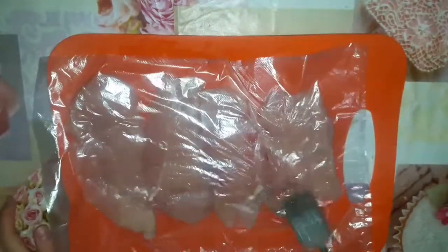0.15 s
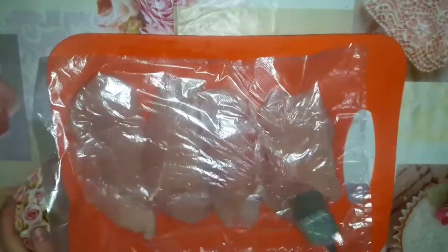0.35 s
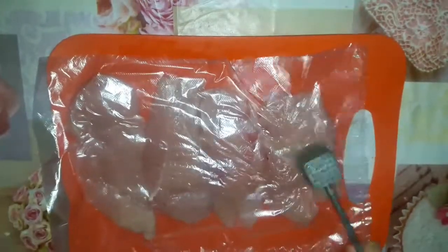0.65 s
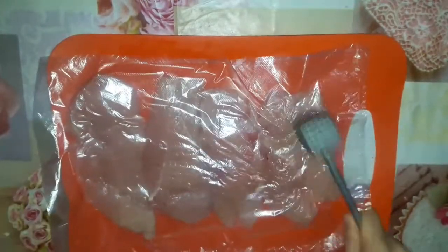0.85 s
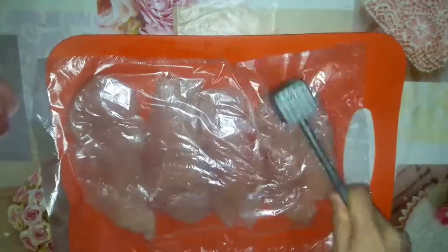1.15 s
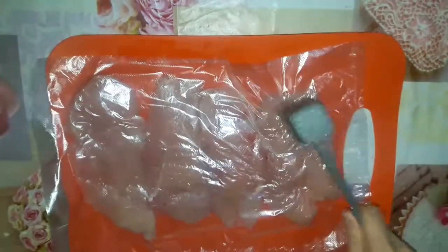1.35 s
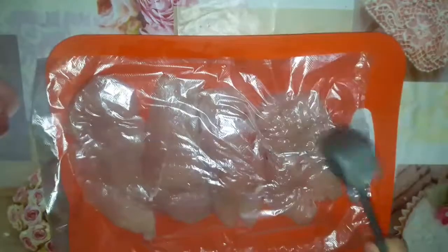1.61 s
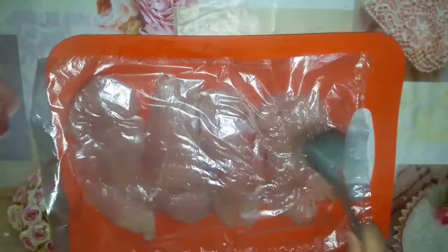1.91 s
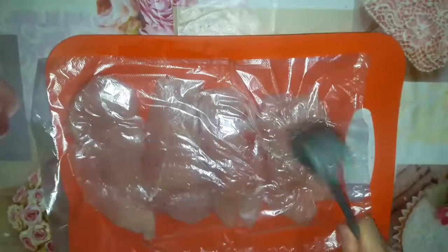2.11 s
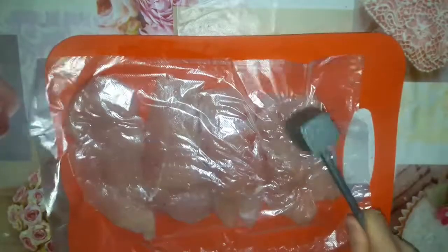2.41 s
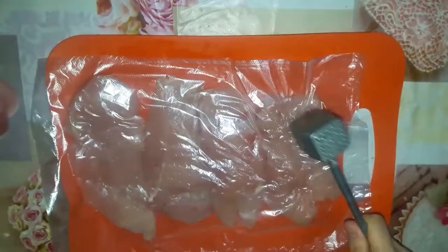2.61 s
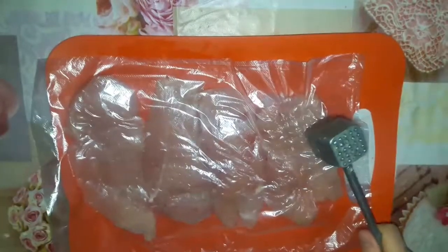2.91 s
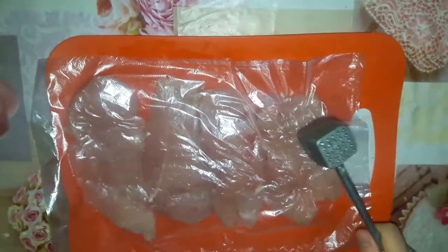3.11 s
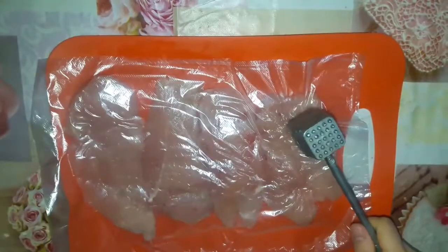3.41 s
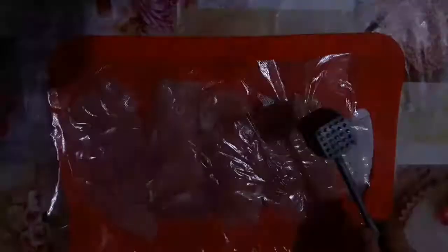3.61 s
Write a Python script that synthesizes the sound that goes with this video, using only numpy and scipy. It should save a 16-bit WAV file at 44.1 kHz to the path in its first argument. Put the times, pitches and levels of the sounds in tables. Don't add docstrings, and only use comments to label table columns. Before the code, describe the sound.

A meat mallet strikes meat through a plastic bag on a plastic board, close up. Twelve even blows run from 0.1 to 2.5 seconds, about five per second, each a crisp film crunch, hard hollow clack and short low thud, generally louder later. Faint sticky ticks follow some blows. Afterwards, soft kitchen hum and hiss remain, with barely audible bag rustles near 3.3 and 3.5 seconds.

```python
import sys
import numpy as np
from scipy import signal
from scipy.fft import rfft, irfft, next_fast_len
from scipy.io import wavfile
from scipy.ndimage import uniform_filter1d

SR = 44100
rng = np.random.default_rng(int(sys.argv[2]) if len(sys.argv) > 2 else 0)


def convert_level_to_amplitude(level_db):
    exponent = np.asarray(level_db, float) / 20
    return 10 ** exponent


def pcm_store(signal):
    levels = np.round(np.clip(np.atleast_2d(signal), -1, 1) * 32767)
    wavfile.write(sys.argv[1], SR, levels.astype(np.int16).T)


N = 165375
PAD = SR // 5

# frequency in Hz, level in dB per Hz.
FLOOR = [(15, -65), (60, -17), (118, -22), (170, -11), (385, -9.5), (414, -14), (599, -13), (1530, -15.5),
         (9000, -38), (11700, -61), (19800, -120)]
FLOOR_DB, HUMS_DB = -61, -67
# frequency in Hz, width in Hz, level in dB.
HUMS = [(142.8, 31, -1), (429, 17, -7.5), (1250, 21, -9), (1541, 38, -12.5), (2780, 110, -15.5),
        (4240, 200, -26.5)]
# frequency in Hz, level in dB.
WHINES = [(199, -73), (240, -75), (1280, -78), (1500, -74), (1600, -83), (145, -68)]
# frequency in Hz, level in dB per Hz.
HISS = [(4710, -38.5), (8000, -25), (10500, -3.5), (11300, -3), (14500, 2), (16000, -2.5)]
HISS_DB = -74.5
# frequency in Hz, likeness from -1 to 1.
PORT_LIKENESS = [(60, 1), (240, 0.93), (950, -0.13), (3770, -0.14), (15000, -0.026)]
# frequency in Hz, left minus right in dB.
PORT_LEAN = [(100, 2), (300, 2.5), (600, 2.5), (2000, 3.5), (5000, 4), (8000, -1), (14000, -1.5)]
APART = 0.4

# start in seconds, clack in dB, clack pitch in Hz, thud in dB, board ring in dB.
BLOWS = [(0.1251, -9, 1613, -14, -24.5), (0.3186, -9.5, 1860, -13.5, -26.5), (0.5007, -5.5, 1880, -17, -12),
         (0.7269, -16.5, 1650, -19, -28.5), (0.9357, -12.5, 1830, -15.5, -22),
         (1.1434, -5.5, 1890, -17.5, -26), (1.359, -4, 1825, -16.5, -27), (1.5878, -12, 1742, -17.5, -26),
         (1.8229, -5.5, 1690, -18, -28), (2.0265, -3, 1938, -14.5, -23), (2.2446, -4, 1930, -19, -27),
         (2.4587, -3, 1940, -18, -27)]
# clack in dB, clack pitch in Hz, thud in dB, board ring in dB.
EARLIER_BLOW = (-17.5, 1803, -22, -22.5)
EARLIER_S = -0.096

# start in seconds, crush in dB, settling in dB,
# settling brightness in dB per octave, creeping in dB.
CRUSHES = [(0.1243, -18.5, -35, 2.6, -45), (0.319, -18, -33, 1.9, -46.5), (0.4973, -27, -31.5, 0.6, -43.5),
           (0.7234, -23.5, -35, 3.6, -50.5), (0.9354, -19.5, -33.5, 3.9, -46),
           (1.1378, -16.5, -29.5, 1.7, -45), (1.3558, -19.5, -30, -0.4, -48), (1.5852, -20, -33, 0, -49),
           (1.8209, -23.5, -33, 0.2, -56), (2.0237, -22.5, -28.5, -0.1, -49),
           (2.2402, -23.5, -34.5, 2.1, -51), (2.454, -19.5, -27, -1.4, -45.5)]
EARLIER_CRUSH = (-24, -28, 4, -44.5)
# frequency in Hz, level in dB per Hz.
BAG = [(1060, -25), (1800, -1), (5540, -2), (7840, -7), (9420, -14), (10700, -6), (11700, -5), (16000, -15)]
BAG_DB, BAG_SNAPS_PER_S, BAG_SPREAD_DB = -7, 25000, 1.5
BAG_RISE_S, BAG_HOLD_S, BAG_T60_S = 0.00053, 0.0048, 0.03
# frequency in Hz, level in dB per Hz.
SETTLE = [(240, -21), (400, -8.5), (1140, -8.5), (1440, -3.5), (1630, -4.5), (1820, -3), (3470, -12.5),
          (14400, -20.5), (16000, -24)]
# frequency in Hz, 60 dB decay in seconds.
SETTLE_T60 = [(500, .3), (2000, 0.26), (5000, 0.2), (9000, 0.14), (15000, 0.17)]
SETTLE_RISE_S, SETTLE_BEND, PATCH_DB = 0.0021, 1.104, 1.5
# frequency in Hz, level in dB per Hz.
CREEP = [(1200, -14), (3000, 3), (6000, 0.5), (9000, -9.5), (12000, -7), (16000, -15)]
CREEP_PER_S, CREEP_T60_S = 14000, 0.46

# multiple of the clack pitch, level in dB, 60 dB decay in seconds.
FACE = [(.5, -16.5, 0.013), (0.718, -16.5, 0.03), (0.931, -4, 0.016), (1.04, 10, 0.016), (1.22, 1, 0.012),
        (1.45, -2, 0.017), (1.8, -13.5, 0.012), (2.6, -24.5, 0.0069)]
# delay in ms, level against the first
# landing in dB, pitch in Hz, hardness of both landings in dB per octave.
ROCKS = [(2.46, 4, 1270, -6), (7.4, -1, 1270, 5), (2.6, -3, 1216, -32), (2.52, -1, 820, -12),
         (0.28, 7.5, 930, -6), (3.6, 7.5, 1760, -28), (2.42, -6, 1185, 11), (1.466, -11.5, 1210, -16.5),
         (1.15, 2, 1210, -16), (2.23, -13, 1120, 5), (2.27, -6, 1246, 18.5), (2.59, -14.5, 630, 13.5),
         (9.4, -6.5, 1800, -4)]
STUD_TOUCH_S, CLACK_LAG_S = 0.000068, 0.00067
# frequency in Hz, level in dB per Hz.
SLAP = [(150, -37), (250, -6.5), (430, -12), (560, -11.5), (749, -13.5), (1040, -9.5), (1590, -10),
        (1900, -18), (2600, -35.5), (3380, -57.5), (5720, -120)]
# frequency in Hz, 60 dB decay in seconds.
SLAP_T60 = [(300, 0.23), (700, 0.41), (1400, 0.13), (2500, 0.33)]
# frequency in Hz, level in dB, 60 dB decay in seconds.
PLATE = [(406, -5.5, 0.23), (481.3, 1.5, 0.14), (578, -13, 0.29), (681, -3.5, 0.1), (763, -9, 0.23),
         (863, -11.5, 0.21), (923, -19, 0.09), (1080, -18.5, 0.13), (1310, -16.5, 0.35)]
BOARD_DB, PLATE_DB, BOARD_RISE_S = -6.5, 0.5, 0.0027

# frequency in Hz, level in dB, 60 dB decay in seconds, side of the node line.
TABLE = [(62.6, -22.5, 0.21, -1), (91.8, -21.5, 0.28, -1), (113.4, 1.5, 0.035, 1), (120.8, -33, 0.71, 1),
         (145.8, -4, 0.16, -1), (151.2, -35.5, 1, 1), (176, -9, 0.069, -1), (194.7, -15.5, 0.2, 1),
         (230.4, -28, 0.37, 1), (316, -10, 0.085, -1)]
# thud lead in ms, ring length factor,
# beating partner in dB, knock in dB.
SEATS = [(-0.0047, 1.04, -16, -29), (0.87, 0.65, -13, -31.5), (0.37, 0.63, -8, -32), (2.2, 0.91, -10, -44),
         (0.43, 0.74, -11, -39), (-0.63, 0.94, -16, -28.5), (0.75, 0.8, -13, -29.5),
         (0.17, 0.88, -26, -32.5), (-0.97, 0.94, -16, -31.5), (0.77, 0.84, -19, -34.5),
         (0.36, 0.86, -13, -28.5), (1.2, 0.9, -20, -37.5), (0.7, 1.2, -13.5, -30.5)]
PUSH_LEAD_S, PUSH_S, RADIATES_HZ, THUD_DB = 0.0004, 0.004706, 122.8, 18
PARTNER_HZ, PARTNER_T60_S = 136.1, 0.14
KNOCK_HZ, KNOCK_SWELL_S = 309.7, 0.0062

# start in seconds, level in dB, tilt in dB per octave.
PEELS = [
    (0.5426, -28.5, -2),
    (.5955, -42.5, -6),
    (.262, -62, -3),
    (1.07, -60, 1),
    (1.498, -44.5, -11),
    (1.722, -44.5, -9),
    (1.947, -63, -1),
    (2.1274, -49, 4),
    (2.377, -46, -9),
    (2.599, -49.5, -9),
]
# middle in seconds, level in dB, length in seconds.
RUSTLES = [
    (3.262, -69, 0.081),
    (3.469, -73, 0.057),
]

# frequency in Hz, 60 dB decay in seconds.
KITCHEN = [(150, 0.38), (400, 0.37), (1000, 0.34), (2000, 0.43), (5000, 0.21), (12000, 0.13)]
THUD_WET_DB, CLACK_WET_DB, BAG_WET_DB, WALL_GAP_S = -22.5, -20, -18, 0.005


def evened(x):
    return x / np.sqrt(np.mean(x ** 2) + 1e-20)


def read(points, hz):
    f, value = np.transpose(points)
    return np.interp(np.log(hz + 1), np.log(f + 1), value)


def add(mix, s, sound):
    part = mix[..., PAD + round(s * SR):][..., :sound.shape[-1]]
    part += sound[..., :part.shape[-1]]


def colour(x, db):
    size = x.shape[-1]
    return irfft(rfft(x) * convert_level_to_amplitude(db(np.fft.rfftfreq(size, 1 / SR))), size)


def fading(x, shape, t60, bend):
    coloured = evened(colour(x, lambda f: read(shape, f)))
    hz, t, z = signal.stft(coloured, SR, nperseg=256)
    fall = convert_level_to_amplitude(-60 * (t / read(t60, hz)[:, None]) ** bend)
    return signal.istft(z * fall, SR, nperseg=256)[1][:, :x.shape[1]]


def ring(t, hz, db, t60):
    return convert_level_to_amplitude(db - 60 * t / t60) * np.sin(2 * np.pi * hz * t)


def snaps(size, per_s, spread_db):
    strength = convert_level_to_amplitude(spread_db * np.minimum(rng.exponential(1, size), 4))
    happens = rng.random(size) < per_s / SR
    a = rng.standard_normal((3, size)) * strength * happens
    return evened(a[0] + 3.2 * APART * a[1:])


def hush(size):
    frames, hz = size // 256 + 5, np.fft.rfftfreq(1024, 1 / SR)
    a, b, c, d, patches = rng.standard_normal((frames, 513, 5)).T
    patches = evened(uniform_filter1d(uniform_filter1d(patches, 14, 0), 10, 1))
    same = np.clip(read(PORT_LIKENESS, hz), -1, 1)[:, None]
    left = a + 1j * b
    right = same * left + np.sqrt(1 - same ** 2) * (c + 1j * d)
    z = np.array([left, right]) * convert_level_to_amplitude(1.3 * patches)

    def shaped(gain):
        return evened(signal.istft(z * gain[:, None], nperseg=1024, noverlap=768)[1][:, :size])

    hums = sum(convert_level_to_amplitude(db) / (1 + (2 * (hz - f) / width) ** 2) for f, width, db in HUMS)
    return convert_level_to_amplitude(FLOOR_DB) * shaped(convert_level_to_amplitude(read(FLOOR, hz))) + convert_level_to_amplitude(HUMS_DB) * shaped(hums)


def wander(t):
    return evened(sum(np.sin(2 * np.pi * (f * t + rng.random())) for f in np.geomspace(0.7, 9, 8)))


def whine(size):
    t, out = np.arange(size) / SR, np.zeros((2, size))
    for hz, db in WHINES:
        drift, swell = wander(t), wander(t)
        turns = hz * t + rng.random((2, 1)) / 4
        out += convert_level_to_amplitude(db + 3.6 * swell) * np.sin(2 * np.pi * turns + 1.8 * drift)
    return out


def microphone_hiss(size):
    noise = rng.standard_normal((2, size))
    return convert_level_to_amplitude(HISS_DB) * evened(colour(noise, lambda hz: read(HISS, hz)))


def crush(db, settle_db, tilt_db, creep_db):
    size = 16384
    t = np.arange(size) / SR - 4 * BAG_RISE_S
    rise = np.exp(np.minimum(t / BAG_RISE_S, 0))
    shape = rise * convert_level_to_amplitude(-60 * np.maximum(t - BAG_HOLD_S, 0) / BAG_T60_S)
    film = evened(colour(snaps(size, BAG_SNAPS_PER_S, BAG_SPREAD_DB), lambda hz: read(BAG, hz)))
    grains, noise = snaps(size, BAG_SNAPS_PER_S, 2.0), rng.standard_normal((2, size))
    wash = fading(8.1 * grains + noise, SETTLE, SETTLE_T60, SETTLE_BEND)
    wash = colour(wash, lambda hz: tilt_db * np.log2(hz / 2000 + 0.1))
    creep = snaps(size, CREEP_PER_S, 1.1) + 4.2 * noise[:, ::-1]
    creep = evened(colour(creep, lambda hz: read(CREEP, hz)))
    tail = convert_level_to_amplitude(settle_db) * wash + convert_level_to_amplitude(creep_db - 60 * t / CREEP_T60_S) * creep
    stir = evened(uniform_filter1d(uniform_filter1d(rng.standard_normal(size), 400), 400))
    fade = np.clip(np.minimum(t / SETTLE_RISE_S, 20 * (t[-1000] - t)), 0, 1)
    return convert_level_to_amplitude(db + BAG_DB) * film * shape + tail * convert_level_to_amplitude(PATCH_DB * stir) * fade


def landing(t, pitch_hz, hardness_db):
    hit = []
    for multiple, db, t60 in FACE:
        hz = pitch_hz * multiple * rng.normal(1, 0.007)
        hard_db = hardness_db * max(np.log2(multiple), 0)
        hit.append(ring(t, hz, db + hard_db + rng.normal(0, 0.73), t60))
    ports = -(1 + rng.uniform(-0.9, 0.9, (2, len(FACE)))) @ np.array(hit)
    return ports / abs(ports.mean(0)).max()


def loose_board(t):
    grains, noise = snaps(len(t), 6000, 2.6), rng.standard_normal((2, len(t)))
    rise = 1 - np.exp(-t / BOARD_RISE_S)
    slap = fading(grains + 0.53 * noise, SLAP, SLAP_T60, 0.59) * rise
    plate = convert_level_to_amplitude(PLATE_DB) * sum(ring(t, *mode) for mode in PLATE) * rise
    return slap / np.std(slap[:, :1500]) + plate


def clack(db, hz, board_db, rock):
    t, out = np.arange(16384) / SR, np.zeros((2, 16384))
    rock_ms, rock_db, rock_hz, hardness_db = rock
    for ms, rel_db, pitch_hz in [(0, 0, hz), (rock_ms, rock_db, rock_hz)]:
        at = round((CLACK_LAG_S + ms / 1000) * SR)
        out[:, at:at + 2000] += convert_level_to_amplitude(rel_db) * landing(t[:2000], pitch_hz, hardness_db)
    touch = np.hanning(round(2 * STUD_TOUCH_S * SR) + 3)
    out = convert_level_to_amplitude(db) * signal.oaconvolve(out, touch[None] / touch.sum(), axes=1)[:, :len(t)]
    high = signal.butter(2, 2 * RADIATES_HZ, "high", fs=SR, output="sos")
    return signal.sosfilt(high, out + convert_level_to_amplitude(board_db + BOARD_DB) * loose_board(t))


def thud(db, length, partner_db, knock_db):
    t = np.arange(SR // 2) / SR
    push = np.sin(np.pi * np.arange(0, PUSH_S, 1 / SR) / PUSH_S)
    modes = ring(t, PARTNER_HZ, partner_db, PARTNER_T60_S * length)
    for hz, mode_db, t60, side in TABLE:
        struck_hz = hz * rng.normal(1, 0.0078)
        modes = modes + np.sign(side) * ring(t, struck_hz, mode_db + rng.normal(0, 1.0), t60 * length)
    high = signal.butter(2, RADIATES_HZ, "high", fs=SR, output="sos")
    pushed = signal.oaconvolve(modes, push / push.sum())
    table = convert_level_to_amplitude(db + THUD_DB) * signal.sosfilt(high, pushed)[:len(t)]
    u = t / KNOCK_SWELL_S
    knock = convert_level_to_amplitude(knock_db) * 2 * u ** 2 * np.exp(-u) * np.sin(2 * np.pi * KNOCK_HZ * t)
    return table + knock


def peel(db, tilt_db):
    def tone(hz):
        thin_bass = 12 * np.maximum(np.log2(2500 / (hz + 50)), 0)
        return tilt_db * np.log2(hz / 6000 + 0.05) - thin_bass

    t = np.arange(1024) / SR
    film = evened(colour(snaps(1024, 20000, 1.5), tone))
    return convert_level_to_amplitude(db - 1.5 - 60 * t / 0.03) * np.minimum(t / 0.00084, 1) * film


def rustle(db, length):
    count = round(length * SR)
    rub = colour(snaps(count, 9800, 1.8), lambda hz: -4.5 * abs(np.log2(hz / 3500 + 0.049)))
    return convert_level_to_amplitude(db) * np.hanning(count) * evened(rub)


def wall_taps():
    taps = np.zeros((2, SR // 2))
    at = np.arange(0, SR // 2 - 20, 12)
    places = at + rng.integers(0, 12, (2, len(at)))
    np.put_along_axis(taps, places, rng.choice([-1., 1.], (2, len(at))), 1)
    hz, t, z = signal.stft(taps, SR, nperseg=256)
    same = np.clip(read(PORT_LIKENESS, hz), 0, 1)[:, None]
    z[1] = same * z[0] + np.sqrt(1 - same ** 2) * z[1]
    tail = signal.istft(z * convert_level_to_amplitude(-60 * t / read(KITCHEN, hz)[:, None]), SR, nperseg=256)[1]
    return np.pad(tail / np.linalg.norm(tail[0]), ((0, 0), (round(WALL_GAP_S * SR), 0)))


def kitchen(x):
    out, turn = np.zeros(x.shape), np.arange(x.shape[1]) / SR * 1.6
    for k in range(3):
        window = np.sqrt(2 / 3) * np.cos(np.pi * (turn + k / 3))
        fed = (x.mean(0) * window)[None]
        out += signal.oaconvolve(fed, wall_taps(), axes=1)[:, :x.shape[1]]
    return out


def scene():
    size = next_fast_len(N + PAD)
    thuds, clacks, film = np.zeros((3, 2, size))
    for s, *how in [(EARLIER_S, *EARLIER_CRUSH), *CRUSHES]:
        add(film, s - 4 * BAG_RISE_S, crush(*how))
    blows = [(EARLIER_S, *EARLIER_BLOW), *BLOWS]
    for (s, db, hz, thud_db, board_db), rock, (early_ms, *seat) in zip(blows, ROCKS, SEATS):
        add(clacks, s, clack(db, hz, board_db, rock))
        add(thuds, s - PUSH_LEAD_S - early_ms / 1000, thud(thud_db, *seat))
    for s, db, tilt_db in PEELS:
        add(film, s - 0.001, peel(db, tilt_db))
    for s, db, length in RUSTLES:
        add(film, s - length / 2, rustle(db, length))
    wet = kitchen(convert_level_to_amplitude(THUD_WET_DB) * thuds + convert_level_to_amplitude(CLACK_WET_DB) * clacks + convert_level_to_amplitude(BAG_WET_DB) * film)
    mix = thuds + clacks + film + wet + hush(size) + microphone_hiss(size) + whine(size)
    leaning = colour(mix, lambda hz: read(PORT_LEAN, hz) * np.array([[0.5], [-0.5]]))
    return leaning[:, PAD:PAD + N]


def band_limit(x):
    return signal.sosfilt(signal.butter(12, 16820, fs=SR, output="sos"), x)


def record(dry):
    edge = signal.firwin(511, 15900, window=("kaiser", 5), fs=SR)[None]
    mix = signal.oaconvolve(dry, edge, "same")
    return band_limit(mix)


dry = scene()
out = record(dry)
pcm_store(out)
```